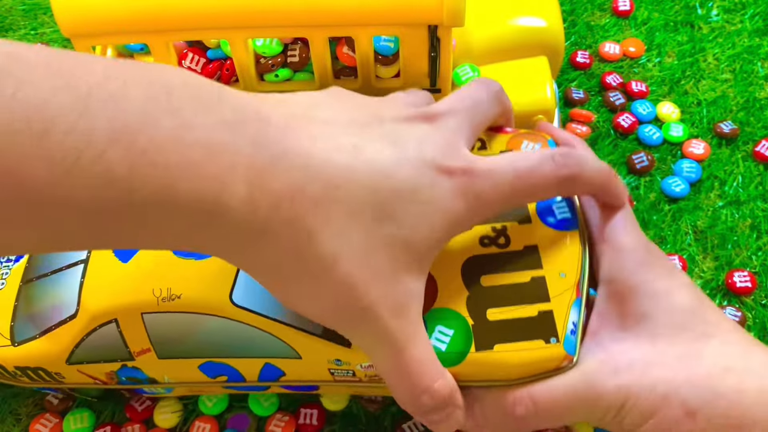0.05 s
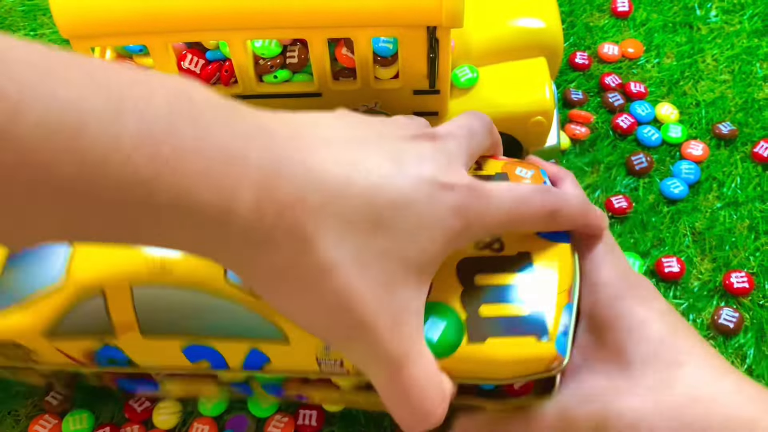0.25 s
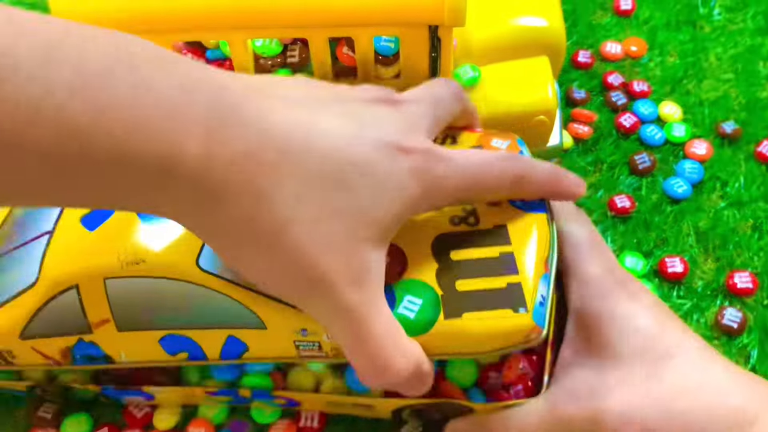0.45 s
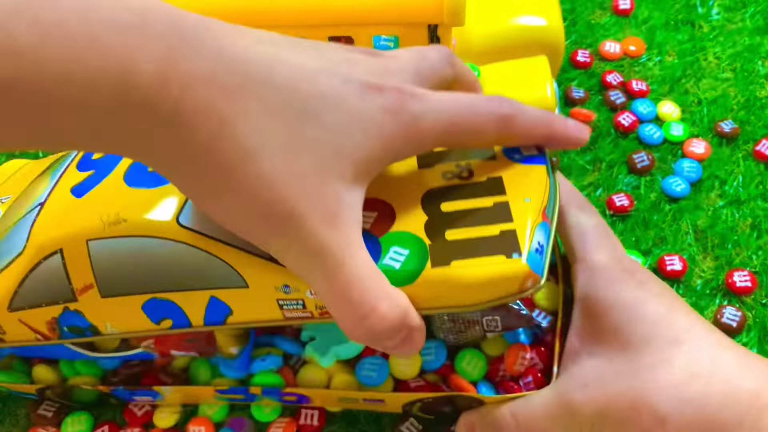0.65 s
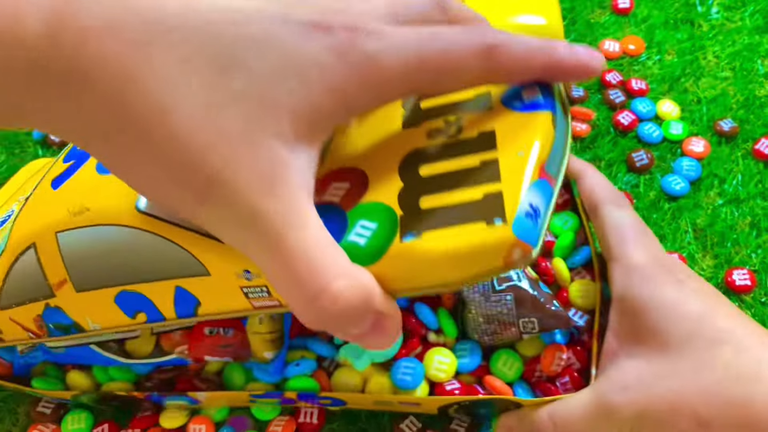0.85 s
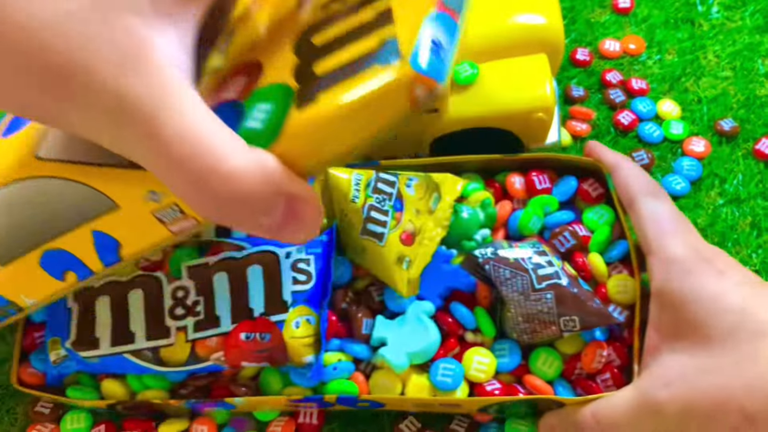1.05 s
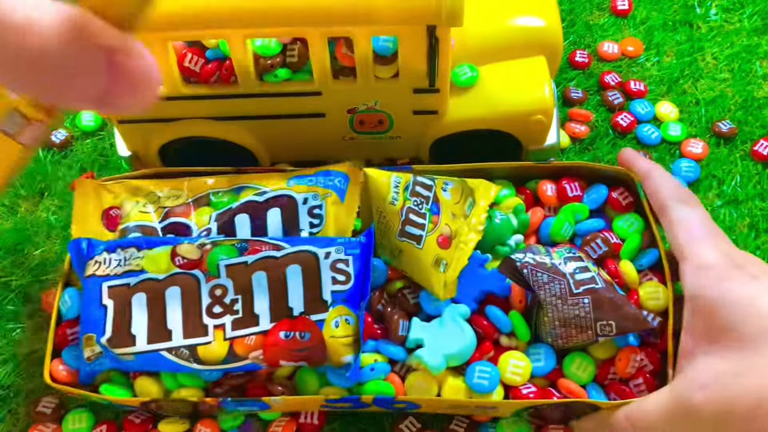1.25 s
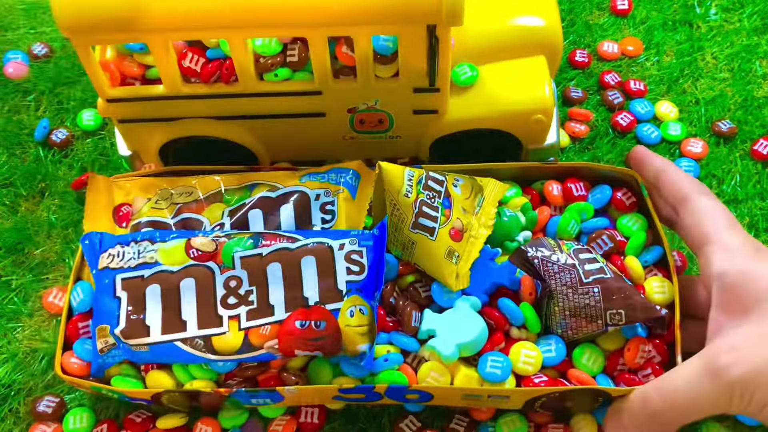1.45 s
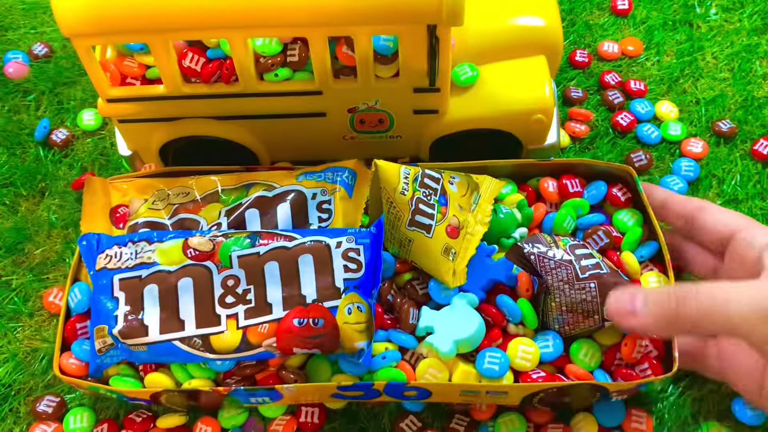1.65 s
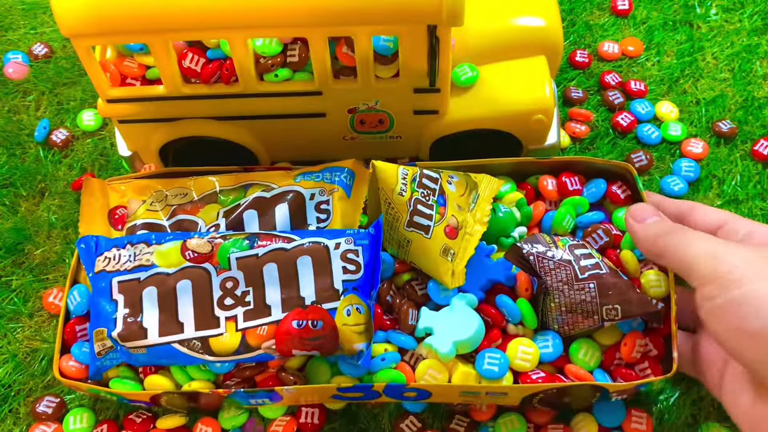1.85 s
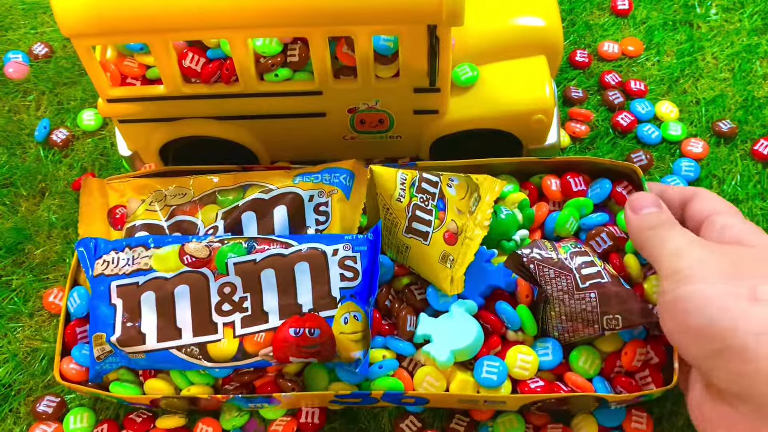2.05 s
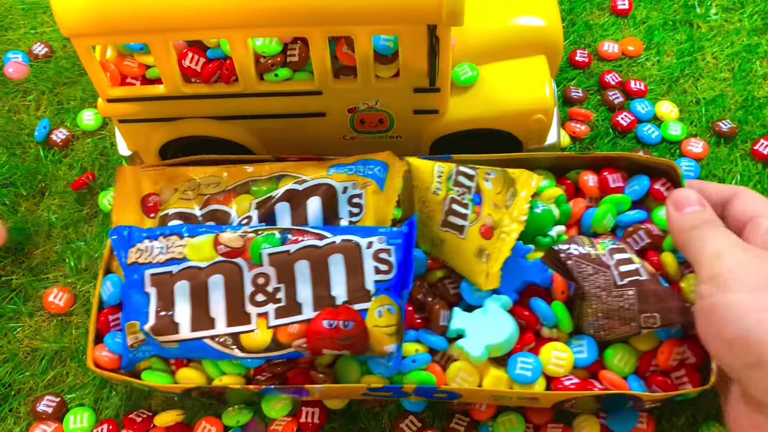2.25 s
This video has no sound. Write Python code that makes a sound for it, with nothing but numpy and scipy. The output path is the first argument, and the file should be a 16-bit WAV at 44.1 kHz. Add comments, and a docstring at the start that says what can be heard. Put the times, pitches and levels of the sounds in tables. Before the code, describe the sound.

Loud pop of a tin's lid coming loose, with rattling sweets and light packet crackle.

```python
"""A few faint knocks, then a loud, overloaded pop: the lid of a sheet-metal sweet tin springs loose
close to the microphone and vibrates in its damped modes. The jolt sets the sweets rattling in a dense
train of impacts, and the lid knocks on the rim as it is lifted away. Sweets and packets then tick
and rustle under the hands, and a finger taps the tin. Beneath it all a low hum fades and stops."""
import sys
import numpy as np
from scipy import signal
from scipy.fft import rfft, irfft, next_fast_len
from scipy.io import wavfile
from scipy.ndimage import map_coordinates

SR = 44100
rng = np.random.default_rng(int(sys.argv[2]) if len(sys.argv) > 2 else 0)


def transcribe(u):
    """Save the signal u as a 16-bit wav file named by the first command-line argument.

    u: samples, shape (n,) or (channels, n), limited to [-1, 1]; the rate is SR.
    q: integer samples, one column per channel.
    """
    v = np.clip(np.atleast_2d(u).T, -1, 1)
    q = np.round(v * 32767).astype(np.int16)
    wavfile.write(sys.argv[1], SR, q)


N = 105840
T = np.arange(N) / SR
RING_T = T[:SR // 3]

# Levels are relative; T60 is the time to decay by 60 dB.
# Modes of the lid: f/Hz, level/dB, T60/s
LID_MODES = [(122, -11.5, 0.023), (325.3, -5.5, 0.048), (421.5, 0, .04), (549.8, -8, 0.056),
             (898, -13.5, .12)]
# Envelope of the rattle: t/s, treble level/dB, midrange level/dB
RATTLE_ENVELOPE = [(.240, -20, -17.5), (.257, 6.5, -0.5), (.275, 2, -10), (.338, -11, -17.5),
                   (.374, -7.5, -15.5), (.426, -14, -23.5), (.46, -25.5, -28), (.6, -50, -54)]
# Spectrum of sweets striking one another: f/Hz, level/dB
SWEET_SPECTRUM = [(2500, -25.5), (4000, -2), (8000, 1.5), (10500, -2.5), (16000, -3)]
# Spectrum of sweets striking the tin: f/Hz, level/dB
WALL_SPECTRUM = [(100, -25), (400, -14), (680, -15), (1100, -3.5), (2050, 0), (3150, -0.5), (3900, -7),
                 (6000, -30.5)]
# Contacts of lid and rim: t/s, level/dB, f/Hz, T60/s
RIM_KNOCKS = [(.0, -29, 374, 0.076), (.074, -32.5, 395, 0.17), (.224, -22.5, 407, 0.4),
              (.326, -18.5, 715, 0.0547), (.392, -21.5, 1762, 0.11), (0.433, -11, 951, 0.019),
              (.433, -16.5, 377, .03), (.577, -24, 771, 0.072), (.577, -30, 408, 0.072),
              (0.644, -23.5, 856, 0.063), (0.698, -31.5, 339, 0.11), (.75, -29.5, 887, 0.12),
              (.803, -33.5, 833, 0.11)]
# Single ticks of sweets and packets: t/s, level/dB, body level re tick/dB
TICK_EVENTS = [(0.122, -40, -3), (0.168, -26, -7.5), (0.6453, -22.5, 0), (0.7485, -24, -16),
               (0.7987, -25.5, -12.5), (0.873, -27, -11), (1.061, -29.5, -2.5), (1.0817, -24, -15),
               (1.1605, -15.5, -24), (1.1699, -14.5, -21), (1.2018, -20, -32), (1.4426, -11, -19.5),
               (1.449, -11.5, -20), (1.7424, -37.5, -14.5), (1.8966, -27.5, -8.5), (1.985, -23.5, -22.5),
               (2.0204, -28.5, -28), (2.0793, -28, -24), (2.186, -39, 3.5), (2.2304, -35.5, 4.5),
               (2.239, -15, -24), (2.2475, -18, -17), (2.2748, -17.5, -7), (2.280, -15, -16),
               (2.3069, -17, -4), (2.3205, -13, -14), (2.3284, -15.5, -8.5), (2.368, -19.5, -5)]
# Spectrum of snaps and crackle: f/Hz, level/dB
SNAP_SPECTRUM = [(2000, -26.5), (6300, -3), (7700, 2.5), (9200, -3.5), (16000, -14)]
# Spectrum of the tin's body answering a tick: f/Hz, level/dB
BODY_SPECTRUM = [(300, -32), (1400, -15), (2100, -1.5), (3000, -2.5), (3750, -9), (4400, 1.5), (5200, -13),
                 (9000, -24)]
# Hands and lid sliding over tin and packets: t/s, duration/s, treble level/dB, midrange level/dB
RUB_STROKES = [(0.548, 0.36, -52.5, -45.5), (0.879, 0.1, -48.5, -41), (1.205, 0.26, -69.5, -56.5),
               (1.012, 0.19, -52, -48), (1.383, 0.12, -40.5, -49.5), (1.885, 0.51, -58.5, -53),
               (2.244, 0.17, -52.5, -41)]
# Spectrum of sliding on metal: f/Hz, level/dB
SLIDE_SPECTRUM = [(150, -15.5), (600, -12.5), (2050, -2), (3100, -7), (4300, -7.5), (6000, -17.5)]
# Modes of the open tin: f/Hz, level/dB, T60/s
TIN_MODES = [(429, 2, 0.054), (770, 2.5, 0.071), (966, -2.5, 0.21), (1943, 3, 0.095)]
# Partials of the hum: harmonic number, level/dB
HUM_PARTIALS = [(2, -41), (3, -44.5)]
# Spectrum of the rumble and hiss: f/Hz, level/dB
RUMBLE_SPECTRUM = [(22, -32), (50, 5.5), (75, -10.5), (300, -25.5), (900, -15), (1400, -20.5), (8000, -36),
                   (16000, -45)]
# Stereo width: f/Hz, side level re mid/dB
STEREO_WIDTH = [(380, -11.5), (900, -3), (2400, 0.5), (8100, 0), (13000, -18.5)]

POP_S, BODY_T60 = 0.242, 0.034
QUADRATURE = np.array([[0], [np.pi / 2]])  # phases of an uncorrelated pair of tones


def lid_pop(level_db=6.5, rise_cycles=1.1, hold_s=0.006):
    """Damped free vibration: the lid clears the rim, its low modes build last, and the hand damps it."""
    out, t = np.zeros((2, N)), RING_T
    for hz, db, t60 in LID_MODES:
        rise_s = rise_cycles / hz
        envelope = np.minimum(t / rise_s, 1) * fade(np.maximum(t - rise_s - hold_s, 0), t60)
        add(out, POP_S, amp(level_db + db) * envelope * np.sin(2 * np.pi * hz * t + QUADRATURE))
    return out


def sweet_rattle(per_s=5000):
    """Superposed impacts: jolted sweets strike one another and the tin, fall back and settle."""
    times, treble_db, mid_db = np.transpose(RATTLE_ENVELOPE)
    sweets = amp(np.interp(T, times, treble_db)) * impacts(per_s, 4, 0.034, SWEET_SPECTRUM, kinds=3)
    walls = amp(np.interp(T, times, mid_db)) * impacts(per_s, 4, BODY_T60, WALL_SPECTRUM, kinds=2)
    return sinking_notch(sweets + walls) * (T > times[0]) * (T < times[-1])


def sinking_notch(x, start_hz=4100, fall_hz_per_s=3300, width_hz=100, depth_db=-18):
    """Time-varying filtering: a narrow dip slides down the spectrum as the lid comes away."""
    hz, s, spectra = signal.stft(x, SR, nperseg=1024)
    centre_hz = start_hz - fall_hz_per_s * (s - POP_S)
    dip = np.exp(-((hz[:, None] - centre_hz) / width_hz) ** 2)
    return signal.istft(spectra * amp(depth_db * dip), SR)[1][:, :N]


def rim_knocks(rise_s=0.0033, roughness=0.57, width_octaves=0.38):
    """Impact with friction: each contact of lid and rim gives a damped tone in a band of scraping noise."""
    out, t = np.zeros((2, N)), RING_T
    f = np.fft.rfftfreq(len(t), 1 / SR) + 1
    for s, db, hz, t60 in RIM_KNOCKS:
        band = 1 / (1 + (np.log2(f / hz) / width_octaves) ** 2) / (1 + (f / hz / 2) ** 2)
        scrape = unit(irfft(rfft(short_noise()) * band, len(t)))
        tone = np.sin(2 * np.pi * hz * t + QUADRATURE) / np.sqrt(2)
        envelope = np.minimum(t / rise_s, 1) * fade(np.maximum(t - rise_s, 0), t60)
        add(out, s, amp(db) * (tone + roughness * scrape) * envelope)
    return out


def ticks(ring_t60=0.058, halving_db=14):
    """Impulse response: packets snap drily; sweets that hit the tin ring longer and excite its walls."""
    snaps, body, t = np.zeros((2, N)), np.zeros((2, N)), RING_T
    answer = np.minimum(t / 0.001, 1) * fade(t, BODY_T60)
    for s, db, body_db in TICK_EVENTS:
        # the ring is half as long for each halving_db drop in body level
        snap = fade(t, ring_t60 * 2 ** (body_db / halving_db)) + amp(-5) * fade(t, 0.0013)
        for track, gain_db, envelope in ((snaps, 4.5, snap), (body, 14.5 + body_db, answer)):
            burst = short_noise() * envelope
            burst /= np.linalg.norm(burst, axis=1, keepdims=True)
            add(track, s + 0.00093, 2 * amp(db + gain_db) * burst)
    return colour(snaps, SNAP_SPECTRUM) + colour(body, BODY_SPECTRUM)


def rustle(rise_s=0.024, release_t60=0.22, flutter_db=3, flutter_per_s=70, per_s=900):
    """Friction noise: each fluttering rub sets packets crackling over a duller slide on metal."""
    treble, mid = np.zeros(N), np.zeros(N)
    for s, duration, treble_db, mid_db in RUB_STROKES:
        stroke = np.clip((T - s) / rise_s, 0, 1) * fade(np.maximum(T - s - duration, 0), release_t60)
        treble += amp(treble_db) * stroke
        mid += amp(mid_db) * stroke
    flutter = amp(flutter_db * map_coordinates(rng.standard_normal(N // 100), [T * flutter_per_s]))
    crackle = treble * impacts(per_s, 8.4, 0.0041, SNAP_SPECTRUM, kinds=4)
    slide = mid * impacts(per_s, 2.3, BODY_T60, SLIDE_SPECTRUM, kinds=3)
    return flutter * (crackle + slide)


def finger_tap(at_s=2.046, level_db=-35.5):
    """Modal excitation: a finger meets the open tin with a dull thud, and the walls ring briefly."""
    out, t = np.zeros((2, N)), RING_T
    band = signal.butter(2, [245, 1990], "band", fs=SR, output="sos")
    thud = unit(signal.sosfilt(band, short_noise())) * fade(t, t60=0.13)
    ring = sum(amp(db) * np.sin(2 * np.pi * (hz * t + rng.random((2, 1)))) * fade(t, t60)
               for hz, db, t60 in TIN_MODES)
    add(out, at_s, amp(level_db) * (thud + ring))
    return out


def room(x, level_db=-8.5):
    """Reverberation: the surroundings return a short, weak, exponentially decaying tail."""
    tail = short_noise() * fade(RING_T, t60=0.35)
    return amp(level_db) * signal.fftconvolve(x, tail / np.linalg.norm(tail[0]), axes=1)[:, :N]


def background(fundamental_hz=55.2, end_s=1.755, hum_db_per_s=-12.5, rumble_db_per_s=-6.5):
    """Exponential decay: a harmonic hum fades and stops; rumble and hiss sink with it, then stay level."""
    hum = sum(amp(db) * np.sin(2 * np.pi * (k * fundamental_hz * T + rng.random()))
              for k, db in HUM_PARTIALS)
    hum *= amp(hum_db_per_s * T) * np.clip((end_s - T) / 0.03, 0, 1)
    rumble = filtered(rng.standard_normal((2, N)), lambda hz: gain_at(RUMBLE_SPECTRUM, hz))
    return hum + amp(-45 + rumble_db_per_s * np.minimum(T, end_s)) * unit(spread(rumble))


def impacts(per_s, scatter_db, t60, spectrum, kinds):
    """Shot noise of unit rms: tiny random collisions, each kind with its own short ring."""
    out = np.zeros((2, N))
    for _ in range(kinds):
        hits = (rng.random(N) < per_s / kinds / SR) * rng.choice([-1, 1], N)
        strength = amp(scatter_db * np.clip(rng.standard_normal(N), -2, 2))
        ring = short_noise() * fade(RING_T, t60)
        out += signal.fftconvolve((hits * strength)[None], ring, axes=1)[:, :N]
    return unit(colour(out, spectrum))


def colour(x, spectrum, size=4096):
    """Minimum-phase filtering: folding the cepstrum gives a causal response, scaled to unit energy."""
    cepstrum = irfft(np.log(gain_at(spectrum, np.fft.rfftfreq(size, 1 / SR))))
    cepstrum[1:size // 2] *= 2
    cepstrum[size // 2 + 1:] = 0
    response = irfft(np.exp(rfft(cepstrum)))
    return signal.fftconvolve(x, response[None] / np.linalg.norm(response), axes=1)[:, :N]


def filtered(x, response):
    """Zero-phase filtering by a gain that depends on frequency."""
    size = next_fast_len(N + SR // 2)
    return irfft(rfft(x, size) * response(np.fft.rfftfreq(size, 1 / SR)), size)[..., :N]


def spread(pair):
    """Mid-side stereo: two uncorrelated signals become left and right, widest in the low treble."""
    angle = lambda hz: np.arctan(gain_at(STEREO_WIDTH, hz))
    mid, side = filtered(pair, lambda hz: np.array([np.cos(angle(hz)), np.sin(angle(hz))]))
    return np.array([mid + side, mid - side])


def gain_at(spectrum, hz):
    """Amplitude ratio from levels interpolated on a logarithmic frequency axis."""
    f, db = np.transpose(spectrum)
    return amp(np.interp(np.log(hz + 1), np.log(f + 1), db))


def amp(db):
    return 10 ** (np.asarray(db) / 20)


def unit(x):
    return x / np.sqrt(np.mean(x ** 2) + 1e-20)


def fade(t, t60):
    return np.exp(-np.log(1000) * t / t60)


def short_noise():
    return rng.standard_normal((2, len(RING_T)))


def add(track, s, sound):
    """Superpose a sound on the track at s seconds."""
    i = round(s * SR)
    track[..., i:i + sound.shape[-1]] += sound[..., :N - i]


def scene():
    """Linear superposition of all sources, with reverberation on the small contacts."""
    contacts = rim_knocks() + finger_tap() + ticks()
    return spread(lid_pop() + sweet_rattle() + contacts + rustle() + room(contacts)) + background()


def record(dry, bass_hz=37.7, hardness=5.7, top_hz=15800):
    """Saturation and band limiting: the recorder sheds deep bass, clips the pop and cuts the top treble."""
    lean = signal.sosfilt(signal.butter(2, bass_hz, "high", fs=SR, output="sos"), dry)
    clipped = lean / (1 + np.abs(lean) ** hardness) ** (1 / hardness)
    return filtered(clipped, lambda hz: 1 / np.sqrt(1 + (hz / top_hz) ** 300))


dry = scene()
out = record(dry)
transcribe(out)
```